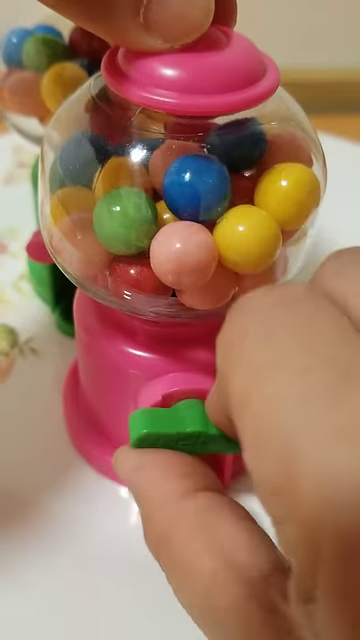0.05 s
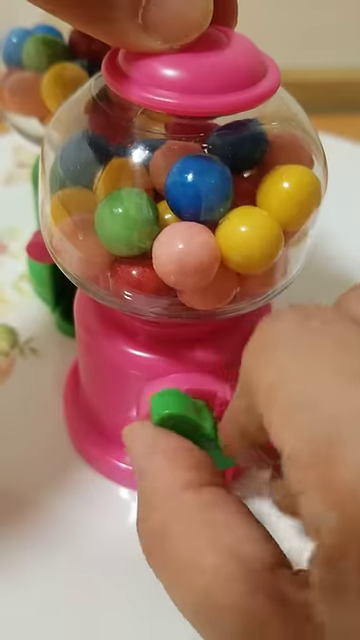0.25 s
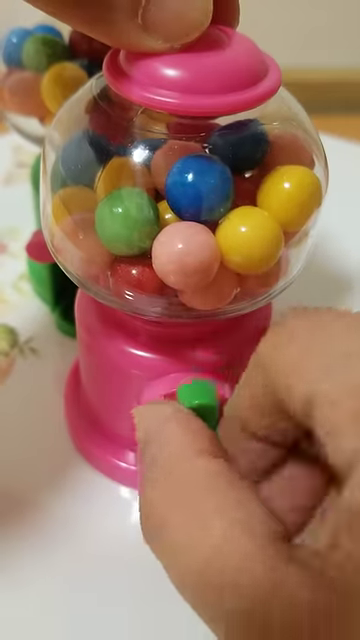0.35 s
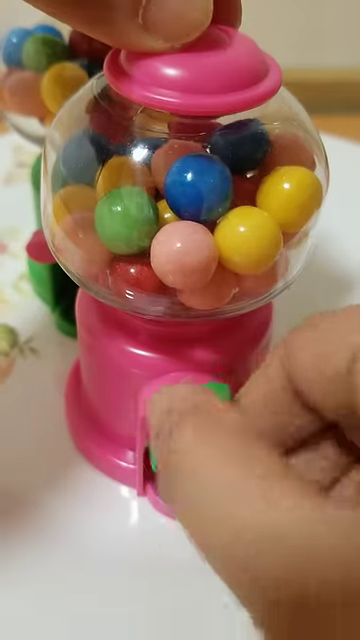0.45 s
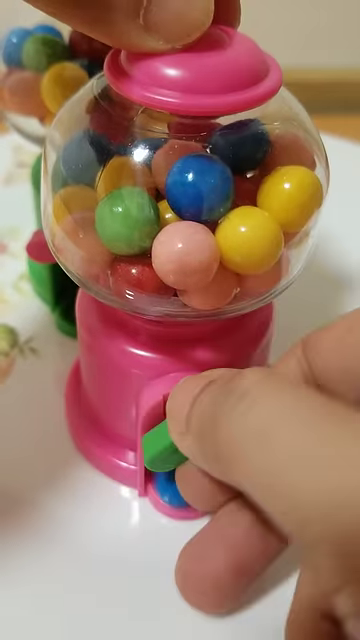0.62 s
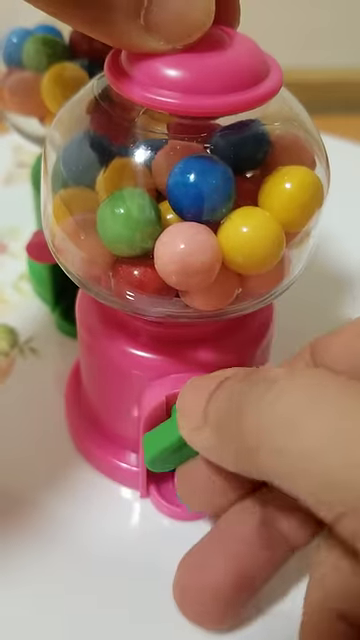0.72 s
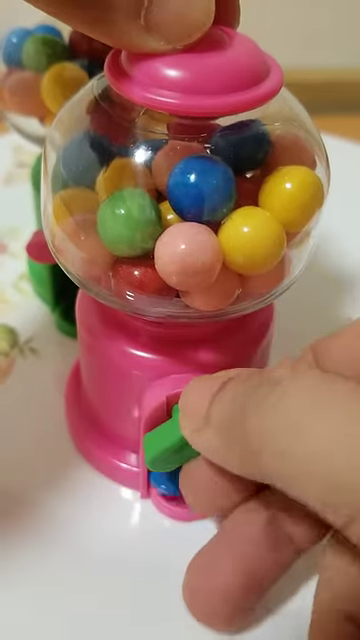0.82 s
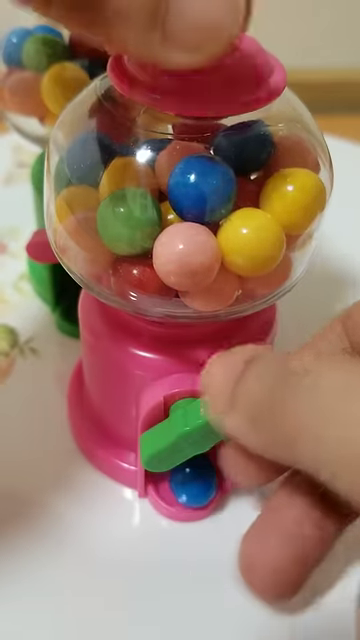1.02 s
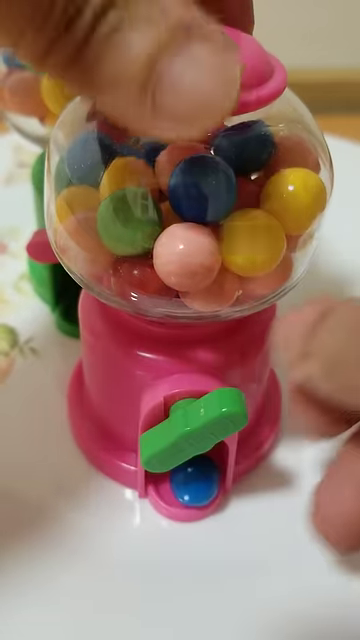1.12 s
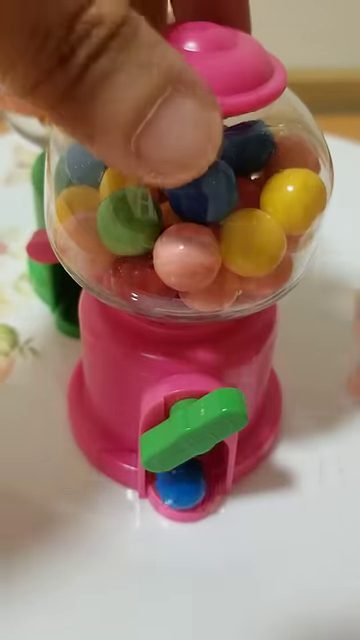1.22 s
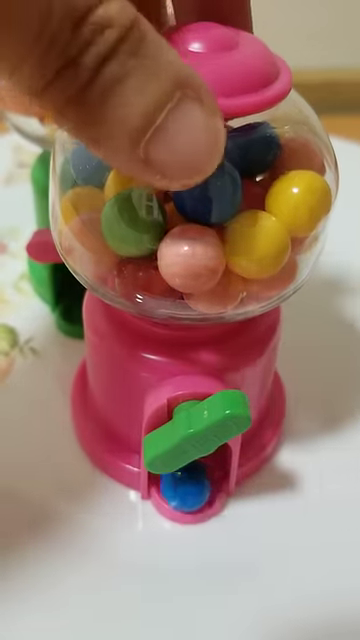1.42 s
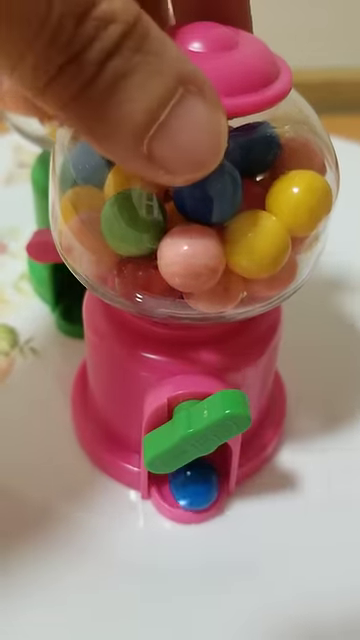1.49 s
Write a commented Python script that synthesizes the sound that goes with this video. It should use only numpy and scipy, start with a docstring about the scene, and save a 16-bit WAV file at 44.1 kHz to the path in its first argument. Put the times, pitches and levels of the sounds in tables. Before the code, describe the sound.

A toy gumball dispenser's plastic knob snaps, then the wheel knocks and scrapes hard balls in the globe; one ball clatters into the tray and settles. Close stereo microphones in a small, lively room with faint hum.

```python
"""Toy gumball machine in a small, lively room

The knob's catch snaps, the wheel knocks and drags gumballs in the globe, and one ball bounces to rest in
the tray: noise cracks with faint modal rings, slip grains for scraping, narrow-band noise for rubs.
The hollow base booms under some of the blows. Behind lie a wavering hum, low room rumble and faint hiss."""
import sys
import numpy as np
from scipy import signal
from scipy.fft import rfft, irfft
from scipy.io import wavfile
from scipy.ndimage import uniform_filter1d

SR = 44100
rng = np.random.default_rng(int(sys.argv[2]) if len(sys.argv) > 2 else 0)


def int16_out(signal):
    """Quantize to a 16-bit WAV file."""
    q = np.round(np.clip(np.atleast_2d(signal).T, -1, 1) * 32767)
    wavfile.write(sys.argv[1], SR, q.astype(np.int16))


N = 68355

# Edges of the contact bands; the room bands reach from half the lowest edge up to the highest: [Hz]
BAND_EDGES_HZ = [350, 900, 2200, 7000, 16500]
# Crack spectrum of the globe: (frequency [Hz], gain [dB])
GLOBE_COLOUR = [(180, -37), (300, -6.5), (321, -18.5), (574, -11.5), (915, -21.5), (1100, -6), (1840, -15),
                (3190, -2), (4020, -8.5), (5520, -10.5), (8220, -25), (11100, -13), (16000, -32)]
# Globe shell modes: (frequency [Hz], level [dB], t60 [s])
GLOBE_MODES = [(1112, -6.5, 0.16), (1240, -5, .25), (2012, -8, .2), (2894, -2.5, .15), (2870, -10, 0.54),
               (3201, -1.5, 0.1), (3303, -2.5, 0.19), (3340, -9.5, 0.35), (3790, -9, 0.13),
               (3810, -8.5, .2), (6200, -7, 0.14)]


def undb(db):
    """Decibels to amplitude gain."""
    return 10 ** (np.asarray(db) / 20)


def unit(x):
    """Scale to an energy of 1."""
    return x / np.sqrt(np.sum(x ** 2) + 1e-20)


def curve(points):
    """Gain over time, linear in dB between (time [s], level [dB]) points."""
    times_s, levels_db = np.array(points).T
    return undb(np.interp(np.arange(N) / SR, times_s, levels_db))


def colour(x, points):
    """Minimum-phase filter through (frequency [Hz], gain [dB]) points."""
    hz, db = np.array(points).T
    size = 4096
    log_bins = np.log(np.fft.rfftfreq(size, 1 / SR) + 1)
    gain = undb(np.interp(log_bins, np.log(hz), db))
    # Folding the cepstrum makes the filter causal.
    cepstrum = irfft(np.log(gain))
    cepstrum[1:size // 2] *= 2
    cepstrum[size // 2 + 1:] = 0
    impulse = irfft(np.exp(rfft(cepstrum)))
    return signal.fftconvolve(x, impulse)[:len(x)]


def band(x, lo_hz, hi_hz, order=3):
    """Butterworth band-pass."""
    edges_hz = [lo_hz, min(hi_hz, SR / 2 - 1)]
    return signal.sosfilt(signal.butter(order, edges_hz, "band", fs=SR, output="sos"), x)


def fade(t, t60_s):
    """Exponential decay, down 60 dB after t60."""
    return np.exp(-np.log(1000) * t / t60_s)


def ring(modes, t):
    """Sum of decaying sine modes with random starting phases."""
    total = np.zeros(len(t))
    for hz, db, t60_s in modes:
        phase = 2 * np.pi * (hz * t + rng.random())
        total += undb(db) * np.sin(phase) * fade(t, t60_s)
    return total


def add(out, x, start_s):
    """Mix x into out from a start time."""
    i = max(int(start_s * SR), 0)
    out[i:i + len(x)] += x[:max(N - i, 0)]


def walk(rate_hz):
    """Slow random drift with zero mean and unit spread: smoothed random steps."""
    hold = int(SR / rate_hz)
    steps = rng.standard_normal(size=256)[np.arange(N) // hold % 256]
    drift = uniform_filter1d(uniform_filter1d(steps, hold), hold)
    return (drift - drift.mean()) / drift.std()


def pair(front, aside, likeness=0.15):
    """The right microphone hears partly the left's sound, partly another side of the toy."""
    return np.array([front, likeness * front + np.sqrt(1 - likeness ** 2) * aside])


def wavering_hum(waver_db, waver_hz):
    """Low sine lines whose level and pitch drift independently."""
    # (time [s], level [dB])
    hum_level = [(0, -51), (.08, -65.5), (.16, -48.5), (.45, -50), (.76, -54.5), (.92, -50), (1.08, -48.5),
                 (1.25, -53), (1.32, -46), (1.43, -55.5), (1.55, -55)]
    # Hum lines: (frequency [Hz], relative level [dB])
    hum_lines = [(99, 1.5), (196, -6.5), (442, -19.5)]
    hum = np.zeros(N)
    for hz, db in hum_lines:
        gain = undb(db + waver_db * walk(17))
        phase = 2 * np.pi * np.cumsum(hz + waver_hz * walk(13)) / SR
        hum += gain * np.sin(phase)
    return hum * curve(hum_level)


def room_air(rms_db, hiss_db, side_db, spread_db):
    """Low coloured noise, wider in the middle range, over faint independent white hiss."""
    # Room rumble spectrum: (frequency [Hz], gain [dB])
    air_colour = [(20, -2), (45, -3), (65, -5.5), (100, -6.5), (150, -3.5), (230, -10.5), (300, -11),
                  (400, -17.5), (550, -18), (900, -32.5), (1200, -33.5), (1600, -43.5), (2700, -50.5),
                  (16000, -57.5)]

    def rumble():
        return unit(colour(rng.standard_normal(N), air_colour)) * np.sqrt(N) * undb(rms_db)

    mid, side = rumble(), rumble()
    wide = undb(side_db) * side + undb(spread_db) * band(side, 450, 3000)
    hiss = undb(hiss_db) * rng.standard_normal((2, N))
    return mid + wide * np.array([[1], [-1]]) + hiss


def room(x, channel):
    """Early bounces off table and hands, then a diffuse tail, as decaying noise per band."""
    # Tail against direct sound: (frequency [Hz], left [dB], right [dB], t60 [s])
    room_bands = np.array([(300, -5.5, 2.5, 0.24), (700, -1.5, 1.5, .4), (1460, -3.5, -4, 0.41),
                           (3000, -5.5, -5, 0.34), (5940, -6.5, -7, .34), (8996, -6, -12.5, .32),
                           (11600, -6, -11.5, .3), (15000, -5, -15.5, .25)], float)
    build_s, early_db, early_t60_s = 0.0032, -5, 0.017
    t = np.arange(SR // 2) / SR
    build = 1 - np.exp(-t / build_s)
    early = unit(build * fade(t, early_t60_s))
    centres_hz = room_bands[:, 0]
    splits_hz = np.sqrt(centres_hz[1:] * centres_hz[:-1])
    edges_hz = [BAND_EDGES_HZ[0] / 2, *splits_hz, BAND_EDGES_HZ[-1]]
    tail = np.zeros(len(t))
    for row, lo_hz, hi_hz in zip(room_bands, edges_hz, edges_hz[1:]):
        level_db, t60_s = row[1 + channel], row[3]
        late = unit(build * fade(t, t60_s))
        shape = np.hypot(undb(level_db) * late, undb(level_db + early_db) * early)
        tail += band(rng.standard_normal(len(t)), lo_hz, hi_hz) * shape
    return signal.fftconvolve(x, tail)[:N]


def base_booms():
    """Modes of the hollow base and table swell and decay under some blows, at their own levels."""
    # (time [s], level [dB])
    thumps = [(0.133, -47.5), (.205, -58), (.357, -48), (.406, -52.5), (.529, -55), (.66, -51.5),
              (.783, -55), (.97, -57.5)]
    # Base modes: (frequency [Hz], relative level [dB], t60 [s])
    base_modes = [(153, -2.5, .4), (284.2, 5, .7), (335, -7, 0.3), (487, -6.5, .15)]
    out, t = np.zeros(N), np.arange(SR // 2) / SR
    onset = 1 - fade(t, 0.0086)
    for start_s, db in thumps:
        add(out, undb(db) * ring(base_modes, t) * onset, start_s)
    return out


def finger_rubs(slips_per_s, width_hz):
    """Random stick-slip impulses drive a narrow resonance of the plastic: short squeaks."""
    # (start [s], length [s], level [dB], pitch [Hz])
    rub_events = [(0.156, .032, -52.5, 3330), (0.465, .07, -41, 3320), (1.195, 0.017, -69, 3480),
                  (1.26, .026, -72, 3580)]
    out = np.zeros(N)
    for start_s, length_s, db, hz in rub_events:
        slips = (rng.random(N) < slips_per_s / SR) * rng.choice([-1, 1], N)
        n = int(np.clip(length_s * SR, 2, N))
        push = slips * np.pad(signal.windows.tukey(n), (0, N - n))
        squeak = band(push, hz - width_hz / 2, hz + width_hz / 2, order=2)
        add(out, undb(db) * unit(squeak) * np.sqrt(n), start_s)
    return out


def ball_scrape(grains_per_s, spread_db, ring_db):
    """Balls slip on the shell and each other: random impulses through crack and shell ring."""
    # Scraping and rolling: (time [s], level [dB])
    scrape_level = [(0, -93), (.05, -74.5), (.12, -67), (.16, -55.5), (.23, -48.5), (.31, -57.5),
                    (.36, -41), (.47, -46), (.52, -46), (.58, -44.5), (.7, -58), (.78, -58.5), (.86, -43.5),
                    (.93, -83), (1.02, -66), (1.1, -76), (1.17, -86), (1.55, -88.5)]
    t = np.arange(SR // 4) / SR
    struck = rng.random(N) < grains_per_s / SR
    slips = struck * rng.choice([-1, 1], N) * undb(spread_db * rng.standard_normal(N))
    crack = unit(colour(rng.standard_normal(len(t)) * fade(t, 0.0023), GLOBE_COLOUR))
    shell = crack + undb(ring_db) * unit(ring(GLOBE_MODES, t))
    x = signal.fftconvolve(slips, shell)[:N]
    return x / x.std() * curve(scrape_level)


def contacts(rows, tint, modes, hold_s, crack_t60_s, ring_db):
    """Hard plastic contacts: a dense noise crack and fainter modal ring, radiated in two directions."""
    out, t = np.zeros((2, N)), np.arange(SR // 3) / SR
    attack = t < .005
    crack_shape = fade(np.maximum(t - hold_s, 0), crack_t60_s)
    ring_onset = 1 - fade(t, crack_t60_s)
    for start_s, *levels_db, lean_db in rows:
        sides = []
        for _ in range(2):
            crack = unit(colour(rng.standard_normal(len(t)) * crack_shape, tint))
            hit = crack + undb(ring_db) * unit(ring(modes, t) * ring_onset)
            side = np.zeros(len(t))
            for db, lo_hz, hi_hz in zip(levels_db, BAND_EDGES_HZ, BAND_EDGES_HZ[1:]):
                part = band(hit, lo_hz, hi_hz)
                side += undb(db) * part / part[attack].std()  # level set over the attack
            sides.append(side)
        left, right = pair(*sides)
        add(out[0], left, start_s)
        add(out[1], right * undb(lean_db), start_s)
    return out


def catch_snaps():
    """The knob's catch snaps: short cracks with the catch's own ring."""
    # (time [s], low [dB], middle [dB], upper [dB], treble [dB], lean to the right [dB])
    snaps = [(.0545, -55, -66, -68.5, -65, 5), (.1318, -42, -42.5, -45, -45.5, -2),
             (.1825, -66, -53, -51.5, -48, -3.5), (.1957, -53, -36.5, -36, -39, -3),
             (.2036, -44, -39, -23.5, -33, 1), (.2087, -46.5, -33.5, -25, -30.5, -3)]
    # Crack spectrum: (frequency [Hz], gain [dB])
    catch_colour = [(300, -4.5), (650, -9), (900, -18), (1450, -5), (2000, -19), (3000, -6.5), (4200, 1),
                    (4850, 3), (5700, -11), (7500, -18), (8800, -11), (10000, -20.5), (12800, -19.5),
                    (16000, -30)]
    # (frequency [Hz], level [dB], t60 [s])
    catch_modes = [(1462, -10, 0.094), (3890, -2.5, 0.13), (4230, -3, 0.19), (4450, -3, 0.12),
                   (4800, 3, .04), (4981, 7.5, .025)]
    return contacts(snaps, catch_colour, catch_modes, hold_s=0.00017, crack_t60_s=0.016, ring_db=-7.5)


def globe_knocks():
    """Wheel and balls knock in the globe, exciting its shell."""
    # (time [s], low [dB], middle [dB], upper [dB], treble [dB], lean to the right [dB])
    knocks = [(.342, -53.5, -46, -44.5, -40, 0.5), (.3562, -47, -32.5, -28.5, -21.5, 1.5),
              (.3675, -48, -37.5, -28.5, -31.5, 1), (.3735, -50, -36, -28, -28, 4.5),
              (.4054, -44, -29.5, -17.5, -21.5, 0.5), (.413, -50.5, -40.5, -30, -30, -0.5),
              (.4414, -43.5, -30, -20.5, -28, -4), (.4638, -44, -36, -30.5, -28, -3.5),
              (.482, -52.5, -37, -33, -37, 1), (.4945, -48, -40, -32.5, -39, -2.5)]
    return contacts(knocks, GLOBE_COLOUR, GLOBE_MODES, hold_s=0.00051, crack_t60_s=0.018, ring_db=-7)


def ball_bounces():
    """The ball strikes chute and tray: quickly damped cracks with the tray's ring."""
    # (time [s], low [dB], middle [dB], upper [dB], treble [dB], lean to the right [dB])
    bounces = [(.5278, -41.5, -31, -22.5, -26.5, 6), (.555, -56, -62, -31, -39, -3),
               (.5592, -55, -58, -32, -35.5, 5), (.640, -55.5, -33.5, -31.5, -31.5, 0),
               (.6562, -56, -45.5, -44.5, -37, 9), (.6637, -44, -40, -34, -32.5, 3.5),
               (.7826, -48.5, -37, -31.5, -31, 3.5), (.7985, -54, -39.5, -37, -43, 3.5),
               (.8112, -52.5, -39, -48.5, -46, 3), (.8203, -69, -46, -39.5, -41, -1),
               (.8432, -53, -40.5, -37.5, -49, 3.5), (.8542, -53, -38, -43, -43.5, -7),
               (.8655, -50, -39.5, -36.5, -41.5, 4.5), (.8725, -64, -55, -55, -47, -8),
               (.9522, -60, -44, -38, -42, -4), (.961, -71, -50, -41.5, -55, 3),
               (.9682, -63, -49, -37.5, -44.5, 2), (.9735, -63, -46, -46.5, -61, 2),
               (1.006, -52.5, -49.5, -49, -71, 2), (1.03, -55.5, -54, -54, -72, 6.5)]
    # Crack spectrum: (frequency [Hz], gain [dB])
    tray_colour = [(300, -10), (650, -13), (900, -14.5), (1200, -4), (2000, -5), (2800, 2.5), (4400, 5),
                   (5600, -3), (7200, -19), (9000, -7), (10300, -14.5), (11600, -14.5), (13300, -19),
                   (16000, -25.5)]
    # (frequency [Hz], level [dB], t60 [s])
    tray_modes = [(1113.5, -10.5, .1), (1266.6, -3.5, 0.065), (2786, -6, 0.092), (3108, 0, 0.064),
                  (3270, -4, 0.092), (3820, -3, 0.067), (4400, -6.5, 0.16), (5570, -9.5, 0.027)]
    return contacts(bounces, tray_colour, tray_modes, hold_s=0.0013, crack_t60_s=0.0095, ring_db=-7)


def scene():
    """The toy as heard by two microphones, with its room and background."""
    # The right microphone faces away: (frequency [Hz], gain [dB])
    shade = [(300, -1), (700, -6), (1400, -4.5), (3000, -7.5), (5500, -3), (7000, -4.5), (9000, -17),
             (11500, -16.5), (14000, -24), (16000, -18.5)]
    scrapes = [ball_scrape(grains_per_s=970, spread_db=3, ring_db=-4) for _ in range(2)]
    squeaks = [finger_rubs(slips_per_s=1400, width_hz=320) for _ in range(2)]
    strikes = catch_snaps() + globe_knocks() + ball_bounces()
    left, right = strikes + pair(*scrapes) + pair(*squeaks)
    # The left sound feeds the room on both sides.
    toy = np.array([left + room(left, 0), colour(right, shade) + room(left, 1)])
    hum = wavering_hum(waver_db=1.3, waver_hz=1.5)
    air = room_air(rms_db=-52, hiss_db=-76, side_db=-11.5, spread_db=1)
    return toy + base_booms() + hum + air


def record(dry):
    """The recorder cuts the top with a steep elliptic low-pass."""
    top_hz = 15900
    return signal.sosfilt(signal.ellip(8, .2, 60, top_hz, fs=SR, output="sos"), dry)


dry = scene()
out = record(dry)
int16_out(out)
```